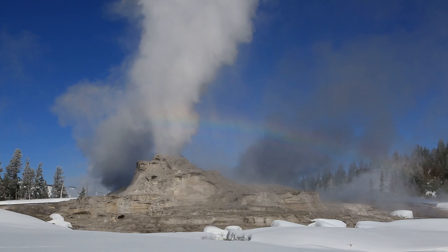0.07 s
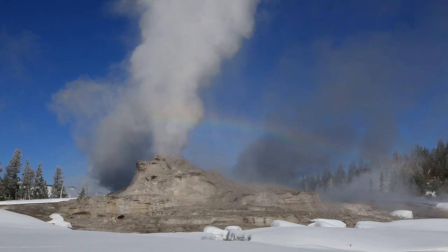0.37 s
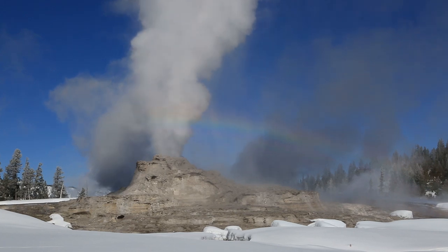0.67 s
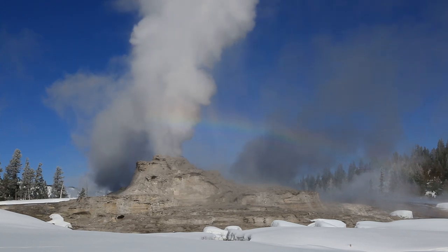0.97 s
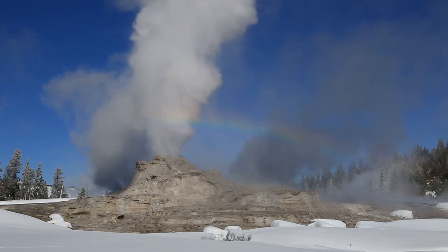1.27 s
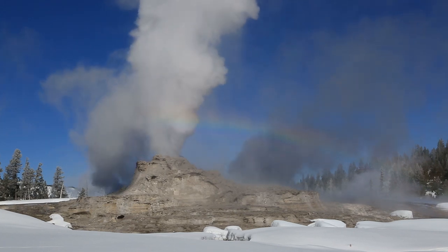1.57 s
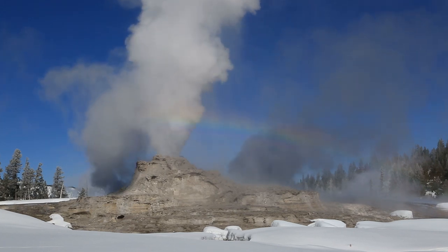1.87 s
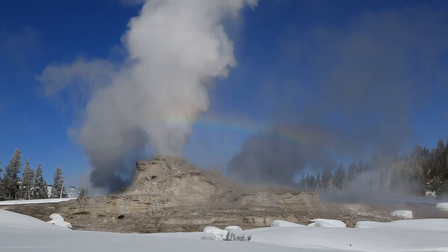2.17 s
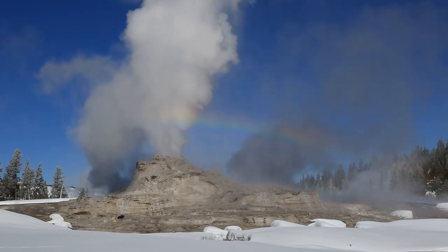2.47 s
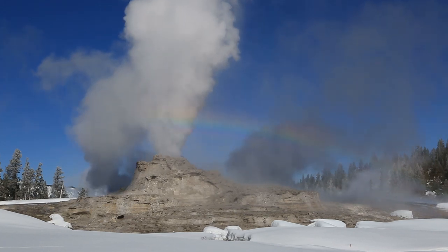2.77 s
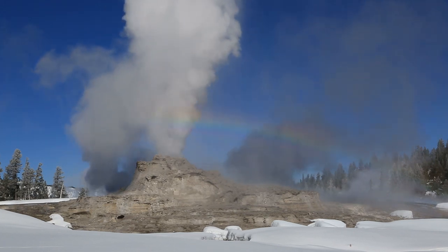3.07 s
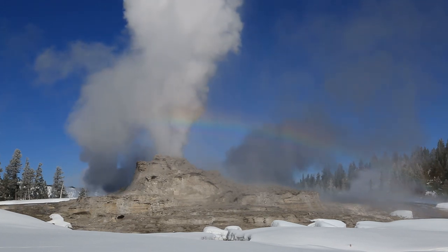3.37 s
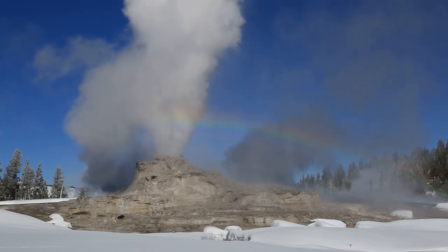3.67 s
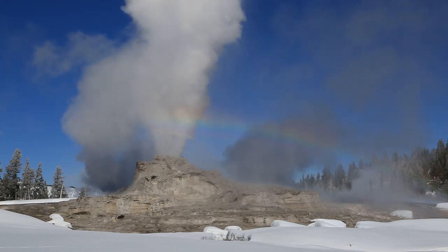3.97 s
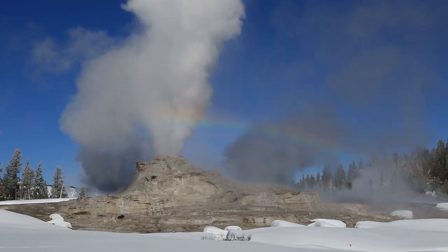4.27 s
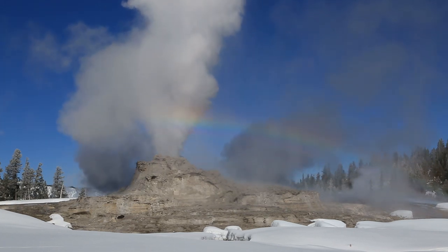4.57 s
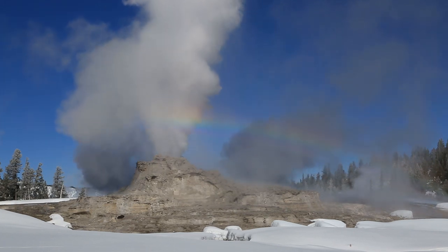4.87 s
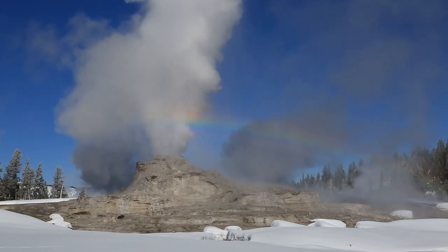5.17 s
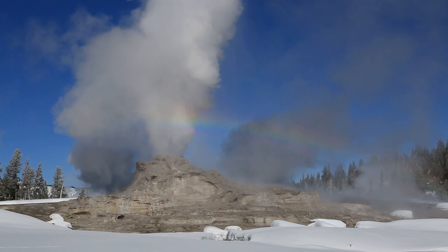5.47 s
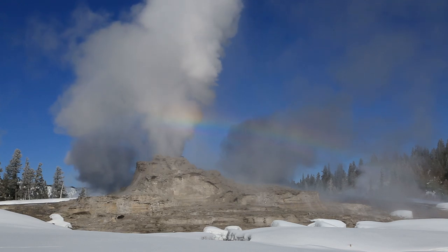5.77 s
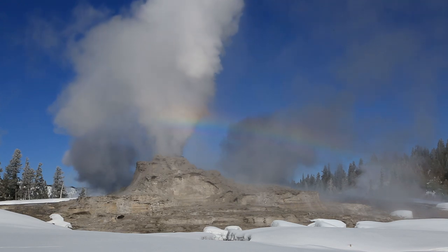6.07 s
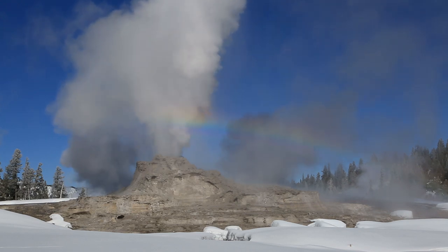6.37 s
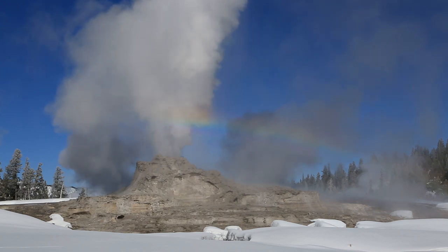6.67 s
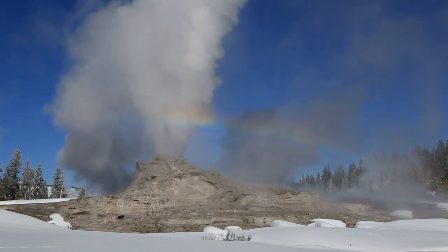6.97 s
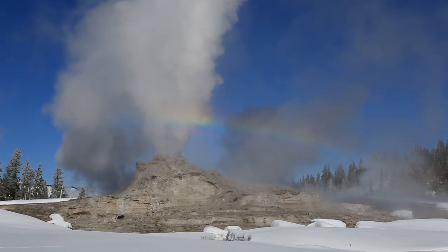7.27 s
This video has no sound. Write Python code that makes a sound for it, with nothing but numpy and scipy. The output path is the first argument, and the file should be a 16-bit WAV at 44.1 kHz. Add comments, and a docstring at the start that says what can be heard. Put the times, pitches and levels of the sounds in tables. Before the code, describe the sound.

A geyser is already erupting as the sound begins, heard from some distance across an open snowfield with no echo. A broad, fluttering roar with a faintly hollow tone runs for the whole seven and a half seconds, over a deep rumble and throb. Above it, steam hisses and sputters, mixed with a fine patter of spray on rock. The roar surges slightly around 1.7, 5.3 and 7 seconds. The hiss is brightest in the first two seconds, turns duller and softer from about 2.5 to 4.5 seconds, then brightens again with small spurts. Soft low thumps swell in the rumble near 2 seconds, between 3.7 and 4.4, and again at 6.2 and 6.7. Light wind buffets the microphone throughout, with short bassy gusts around 2.2, 4.8, 5.7 and 6.5 seconds. The eruption carries on steadily to the end.

```python
"""An open snowfield, some distance from an erupting cone geyser.
Light wind buffets the microphone. Eddies in the churning column radiate a rumble and a throb.
Steam hisses, brighter or duller as the plume sways, and spray patters on the cone.
The turbulent jet roars, and the flow excites resonances in the rocky vent and the hollows of the cone."""
import sys
import numpy as np
from scipy import signal
from scipy.fft import rfft, irfft
from scipy.io import wavfile
from scipy.ndimage import uniform_filter1d

SR = 44100
rng = np.random.default_rng(int(sys.argv[2]) if len(sys.argv) > 2 else 0)


def transcribe(signal):
    """Save signal, clipped to [-1, 1], as a 16-bit WAV file at the path in sys.argv[1]."""
    frames = np.atleast_2d(signal).T
    limited = np.clip(frames, -1, 1)
    pcm = np.round(limited * 32767).astype(np.int16)
    wavfile.write(sys.argv[1], SR, pcm)


N = 332514
TIME = np.arange(N) / SR
BIN_HZ = np.maximum(np.arange(N // 2 + 1) * SR / N, 1)


def from_db(db):
    """Decibels to amplitude ratio."""
    return 10 ** (np.asarray(db) / 20)


def rms_one(x):
    """Normalisation to unit rms."""
    return x / np.sqrt(np.mean(x ** 2) + 1e-20)


def in_time(rows):
    """Linear interpolation of each column against the first, which is time."""
    times, *columns = np.transpose(rows)
    return [np.interp(TIME, times, values) for values in columns]


def swells(rows):
    """Raised-cosine rises and dips of level, in dB."""
    return sum(db * np.cos(np.pi * np.clip((TIME - centre) / length, -.5, .5)) ** 2
               for centre, length, db in rows)


def colour(x, spectrum):
    """Spectral shaping, with nothing above the spectrum's last point; unit rms."""
    hz, db = np.transpose(spectrum)
    gain = from_db(np.interp(np.log(BIN_HZ), np.log(hz), db, right=-np.inf))
    return rms_one(irfft(rfft(x) * gain, N))


def drift(rate_hz):
    """Random fluctuation: noise low-passed by two poles at rate_hz; unit rms."""
    pole = np.exp(-2 * np.pi * rate_hz / SR)
    slow = signal.lfilter([1], [1, -2 * pole, pole * pole], rng.standard_normal(N + SR))
    return rms_one(slow[SR:])


def turbulence(spectrum, steady_s):
    """Flow noise: coloured noise whose power is held near one over spans of steady_s."""
    noise = colour(rng.standard_normal(N), spectrum)
    span = max(int(steady_s * SR), 1000)
    local_power = uniform_filter1d(uniform_filter1d(noise ** 2, span), span)
    return noise / np.sqrt(local_power)


def blown_resonance(hz, width_hz):
    """Cavity resonance: turbulent forcing yields a narrow noise band whose centre may move."""
    phase = 2 * np.pi * np.cumsum(hz * np.ones(N)) / SR
    return rms_one(drift(width_hz) * np.cos(phase) + drift(width_hz) * np.sin(phase))


# Wind spectrum. Each row: frequency in Hz, relative density in dB.
WIND_SPECTRUM = [(10, -7), (21, -4.5), (31, 4), (39, 4.5), (46, 2), (55, 2), (70, -10.5), (300, -74)]
# Stronger gusts. Each row: centre in seconds, length in seconds, rise in dB.
WIND_GUSTS = [(0.5, 0.4, 2.5), (2.17, 0.43, 7.5), (4.12, 0.17, 4), (4.8, 0.33, 5.5), (5.71, .16, 10),
              (6.2, .14, 7), (6.54, 0.24, 7.5), (7.49, .2, 4)]
def wind(level_db=-28.5):
    """Turbulent pressure fluctuations: a breeze buffets the microphone in the lowest bass."""
    return from_db(level_db + swells(WIND_GUSTS)) * turbulence(WIND_SPECTRUM, steady_s=0.15)


# Spectra of the large and the smaller eddies. Each row: frequency in Hz, relative density in dB.
RUMBLE_SPECTRUM = [(25, -8.5), (40, -17), (50, 0), (58, -1.5), (70, -0.5), (80, -4), (90, 0.5),
                   (103, -12.5), (130, -23.5), (200, -81)]
THROB_SPECTRUM = [(70, -26), (104, -5.5), (120, 0.5), (142, 1), (158, -8.5), (173, -12.5), (192, -10),
                  (215, -19.5), (260, -20.5), (400, -70)]
# Their envelopes. Each row: time in seconds, relative level in dB.
RUMBLE_ENVELOPE = [(0.1, -26), (0.85, -28.5), (1.2, -24), (1.9, -29), (3.2, -26), (4.6, -28), (5.1, -26),
                   (6.3, -29.5), (6.7, -26), (7.5, -26.5)]
THROB_ENVELOPE = [(0.1, -36), (1.7, -37.0), (3.1, -32.5), (3.7, -36.0), (4.3, -34.5), (4.8, -35),
                  (6.8, -34.5), (7.5, -35)]
# Thumps of the largest eddies. Each row: centre in seconds, rise in dB.
EDDY_THUMPS = [(1.96, 4), (3.75, 7), (4.11, 3), (4.29, 5.5), (4.39, 4), (5.06, 2.5), (5.67, 2), (6.19, 4),
               (6.68, 4.5)]
def column(thump_s=0.13):
    """Eddy size sets frequency: large eddies rumble, smaller ones throb; a thump lifts both."""
    rumble_db, = in_time(RUMBLE_ENVELOPE)
    throb_db, = in_time(THROB_ENVELOPE)
    thump_db = swells([(centre, thump_s, db) for centre, db in EDDY_THUMPS])
    rumble = from_db(rumble_db + 1.1 * drift(7.5)) * turbulence(RUMBLE_SPECTRUM, steady_s=0.09)
    throb = from_db(throb_db - 0.5) * turbulence(THROB_SPECTRUM, steady_s=0.09)
    return (rumble + throb) * from_db(thump_db)


def spray(drops_per_s, size_spread_db):
    """Shot noise: drops of uneven size strike the cone at a rate that wanders about drops_per_s."""
    lands = rng.random(N) < drops_per_s * from_db(3.5 * drift(18)) / SR
    sizes = from_db(size_spread_db * np.minimum(rng.exponential(1, N), 4))
    return rms_one(lands * sizes * rng.choice([-1, 1], N))


# Treble bands. Each row: centre in Hz, gain in dB per dB of brightness.
TREBLE_BANDS = [(2800, 0.05), (5000, 0.42), (8000, 0.95), (11000, 1.8)]
def brighten(x, bright_db):
    """Varying spectral tilt: the treble swells or fades, the highest bands most."""
    centres, shares = np.transpose(TREBLE_BANDS)
    spectrum, tilted = rfft(x), 0
    for share, pick in zip(shares, np.eye(len(shares))):
        band = irfft(spectrum * np.interp(BIN_HZ, centres, pick), N)
        tilted = tilted + band * from_db(share * bright_db)
    return tilted


# Steam spectrum. Each row: frequency in Hz, relative density in dB.
HISS_SPECTRUM = [(400, -24), (800, -6), (1150, 1), (1470, -3), (1720, 1), (2120, -1.5), (2450, 0.5),
                 (3500, -1.04), (5000, -6), (6900, -10.5), (8100, -9), (9200, -12), (11000, -20),
                 (16000, -38)]
# Sway of the plume. Each row: time in seconds, relative levels of the hiss and of its top in dB.
PLUME_SWAY = [(0.1, -49.5, -60), (0.3, -46.6, -56), (0.62, -48.5, -58.5), (1.4, -48.5, -58.5),
              (1.65, -47.5, -55.9), (2.15, -48.3, -57), (2.55, -50.5, -64), (3.0, -52.0, -66.5),
              (3.4, -51, -65), (3.8, -51.5, -65), (4.5, -51.5, -63.7), (5.03, -49.5, -58),
              (5.2, -51.2, -61.5), (5.4, -50, -58.5), (6.3, -51.5, -60.9), (7.0, -48.9, -57.5),
              (7.5, -49.5, -59)]
# Spurts and chokes. Each row: centre in seconds, length in seconds, change in dB,
# which is divided between level and brightness.
STEAM_SPURTS = [(0.64, .12, -2), (2.1, .2, 0.5), (4.16, 0.081, 2), (4.81, 0.1, 2.5), (5.8, .12, 1.5),
                (6.61, .18, 2), (6.79, 0.15, -2), (7.4, 0.2, 1.5)]
# Vent resonances. Each row: frequency, width and wander in Hz, relative level in dB,
# gain in dB per dB of brightness.
VENT_MODES = [(1294, 49, 10, -15, 0), (1883, 85, 35, -12.3, -0.3)]
def steam(spray_db=-9.5, usual_top_db=-9.5, level_share=0.62):
    """Broadband flow noise, with spray and vent resonances; its treble follows the plume's sway."""
    hiss_db, top_db = in_time(PLUME_SWAY)
    spurt_db = swells(STEAM_SPURTS) + 0.5 * drift(13)
    bright_db = top_db - hiss_db - usual_top_db + (1 - level_share) * spurt_db
    sputter = rng.standard_normal(N) * from_db(0.63 * drift(35))
    patter = from_db(spray_db) * spray(drops_per_s=1500, size_spread_db=4.5)
    hiss = from_db(1.64) * brighten(colour(sputter + patter, HISS_SPECTRUM), bright_db)
    vent = sum(from_db(db + follows * bright_db) * blown_resonance(hz + wander * drift(1.2), width)
               for hz, width, wander, db, follows in VENT_MODES)
    return from_db(hiss_db + level_share * spurt_db) * (hiss + vent)


# Jet spectrum. Each row: frequency in Hz, relative density in dB.
JET_SPECTRUM = [(120, -23), (210, 1), (265, 0), (300, 0), (430, -0.5), (510, -3.5), (720, -7), (1000, -10),
                (1250, -15.5), (1500, -18.5), (3000, -57)]
# Jet envelope. Each row: time in seconds, relative level in dB.
JET_ENVELOPE = [(0.1, -44), (1.9, -42.5), (2.8, -44), (3.4, -43.0), (4.3, -44), (5.3, -43.5), (6.5, -45.5),
                (7.1, -43)]
# Surges as slugs of water pass. Each row: centre in seconds, length in seconds, rise in dB.
JET_SURGES = [(1.23, 0.12, 1), (1.70, 0.22, 3.5), (2.07, .2, 2), (4.27, 0.064, 3), (5.34, 0.15, 3),
              (6.05, .12, 2), (7.07, .3, 1.5), (7.38, .18, 2)]
# Hollows of the cone. Each row: frequency in Hz, width in Hz, relative level in dB.
CONE_MODES = [(341.5, 34, -9), (387, 34, -8), (600, 50, -12.5), (876, 56, -17.5)]
def jet():
    """Turbulent mixing noise: a broad roar surges, flutters and excites the hollows of the cone."""
    jet_db, = in_time(JET_ENVELOPE)
    hollows = sum(from_db(db) * blown_resonance(hz, width) for hz, width, db in CONE_MODES)
    flutter_db = drift(27)
    roar = from_db(-0.68) * turbulence(JET_SPECTRUM, steady_s=0.07)
    return (roar + hollows) * from_db(jet_db - 0.9 + swells(JET_SURGES) + flutter_db)


def scene():
    """Superposition in a free field: snow absorbs the reflections, so every source arrives dry."""
    return (column() + jet() + steam() + wind())[None]


def record(dry):
    """Self-noise and band limiting: the microphone adds faint hiss; the sound opens abruptly."""
    self_noise_db, start_s, cutoff_hz = -68.8, 0.069, 15750
    self_noise = from_db(self_noise_db) * rng.standard_normal(dry.shape)
    low_pass = signal.ellip(12, .1, 80, cutoff_hz, fs=SR, output="sos")
    return signal.sosfilt(low_pass, (dry + self_noise) * (TIME >= start_s))


dry = scene()
out = record(dry)
transcribe(out)
```